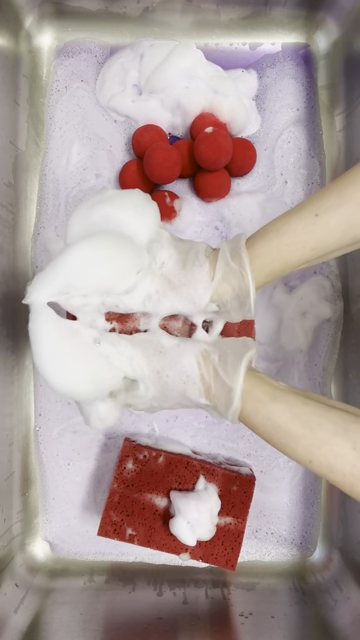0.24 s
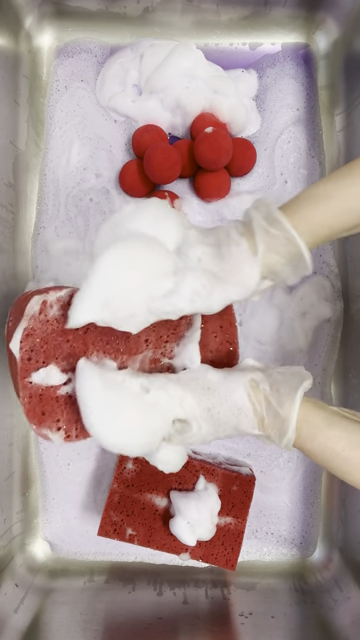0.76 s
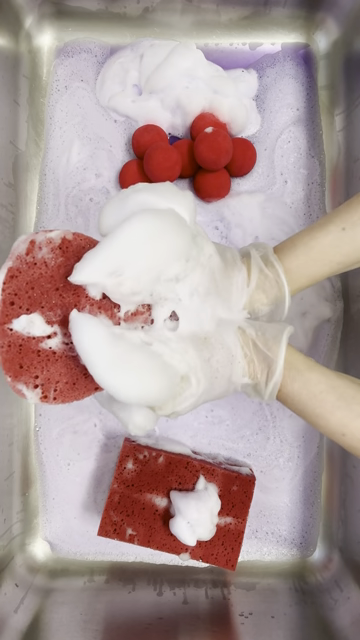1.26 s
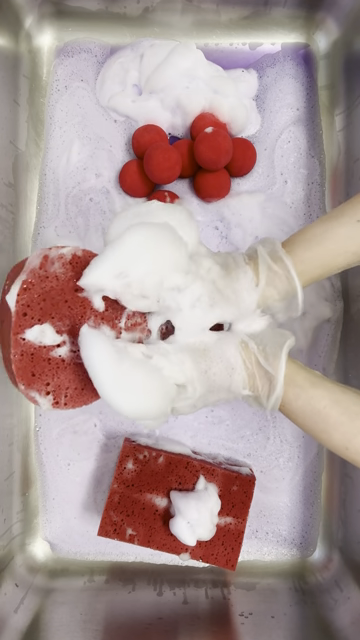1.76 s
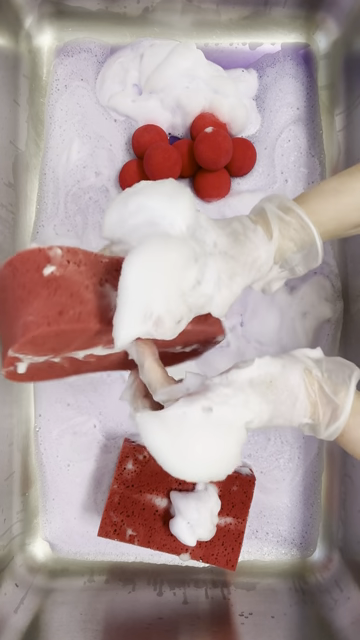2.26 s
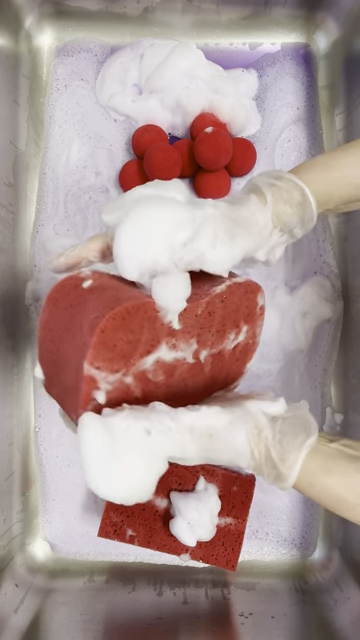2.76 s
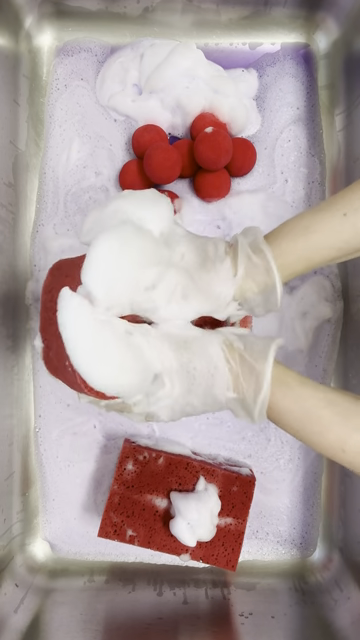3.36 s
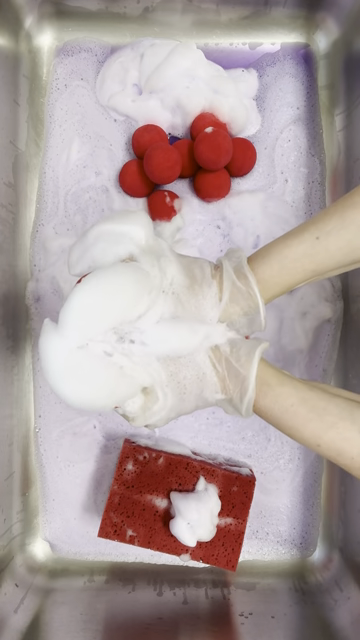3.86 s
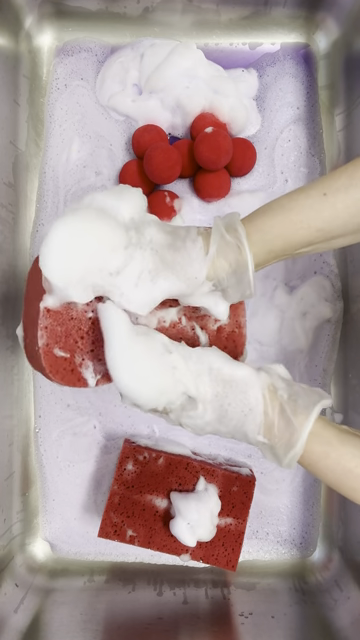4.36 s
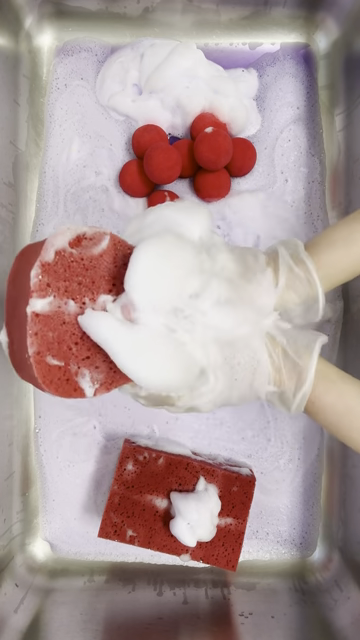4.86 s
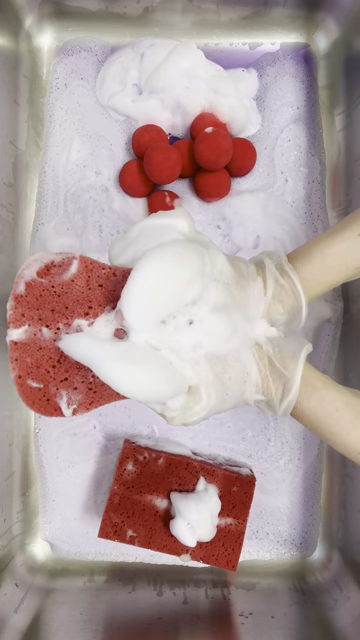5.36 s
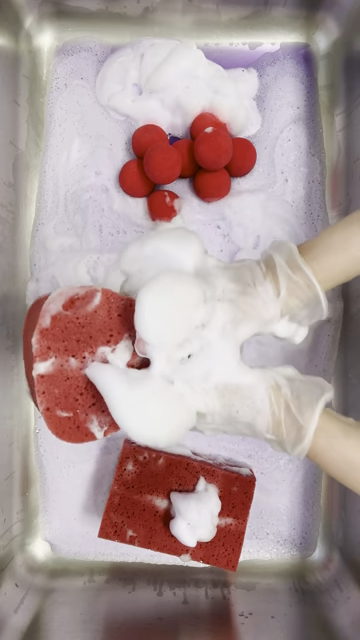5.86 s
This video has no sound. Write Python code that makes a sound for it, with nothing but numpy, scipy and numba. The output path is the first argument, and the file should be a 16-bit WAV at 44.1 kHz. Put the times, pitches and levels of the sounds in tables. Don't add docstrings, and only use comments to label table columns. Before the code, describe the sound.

Very close, intimate sound of a soapy sponge being pressed and released. It starts abruptly with a loud squelchy snap, then calms. Later squeezes gurgle with low air gulps, popping mid-pitched bubbles and fine crackling froth, separated by hushed pauses of light fizz and soft dull nudges of the metal tub. Quiet indoor room, faint hiss and hum, phone microphone.

```python
import sys
import numpy as np
from scipy import signal
from scipy.fft import rfft, irfft
from scipy.io import wavfile
from scipy.ndimage import uniform_filter1d
from numba import njit

SR = 44100
rng = np.random.default_rng(int(sys.argv[2]) if len(sys.argv) > 2 else 0)


def waveform_to_disk(signal):
    frames = np.transpose(np.atleast_2d(signal))
    scaled = np.clip(frames, -1, 1) * 32767
    samples = np.round(scaled).astype(np.int16)
    wavfile.write(sys.argv[1], SR, samples)


def voltage_ratio(level):
    return 10 ** (np.asarray(level, float) / 20)


N = 269447
HZ = np.arange(N // 2 + 1) * SR / N
MEDIUM_DB = -50

# lowest f/Hz, highest f/Hz, grains per s, length/cycles,
# glide per cycle, size scatter/dB, tilt/dB per octave
CROWDS = [
    (115.2, 485, 700, 4.2, 0.012, 0, -1),
    (459, 1406, 2500, 3.3, 0.0023, 0.5, 0.5),
    (1350, 2332, 2500, 5.9, 0.0038, -1.5, 2.5),
    (2250, 8500, 9000, 2.5, 0.0096, 0, -0.5),
]
FROTH_SKIN = (8000, 15800, 9806, 1, 0, 0, -26)
# level at a medium move/dB, force/dB per dB, share of the wetness
ANSWERS_TO_GRIP = [(-5.5, 1.05, -0.19), (-1.5, 1.08, -0.21), (-1.6, 0.95, 0.38), (-2.06, 0.9572, 0.78)]
# peak t/s, rise/s, fall/s, level/dB, wetness (fizz
# over pores)/dB
GRIP_MOVES = [(.012, 0.017, 0.039, -32.5, -7.5), (.04, 0.1, 0.1, -43.5, -0.5), (.095, .07, 0.038, -47, 0),
              (.15, 0.06, .06, -57, -7), (.205, 0.019, .04, -58, 7), (.25, 0.041, 0.05, -54.5, 9.5),
              (.3, 0.093, 0.17, -49, 0), (1.12, 0.25, 0.3, -51, -8.5), (1.19, 0.11, .1, -55.5, 5),
              (1.377, 0.39, 0.29, -40.5, -1), (1.5, 0.24, 0.14, -41.5, -3.5), (1.55, .08, 0.06, -47, -10),
              (1.72, 0.014, 0.11, -46.5, -3.5), (1.77, 0.055, 0.14, -49.5, -1.5),
              (3.455, 0.041, 0.17, -52.5, 4), (3.575, .05, 0.084, -57, -6), (3.71, 0.31, 0.18, -40.5, 0),
              (3.83, 0.62, 0.13, -42, -2.5), (3.9, 0.066, 0.042, -50.5, -2),
              (4.052, 0.03, 0.09, -51.5, 2.5), (4.116, 0.15, 0.23, -51, -1),
              (5.01, 0.15, 0.22, -47.5, -0.5), (5.11, .06, .08, -56, -4), (5.17, 0.17, 0.28, -44, 1.5),
              (5.33, 0.4, 0.32, -42, -1), (5.511, 0.55, 0.18, -44, -0.5),
              (5.77, 0.052, 0.068, -54.5, 1.5), (5.845, 0.12, 0.15, -45.5, -4),
              (.583, 0.32, 0.24, -54, -2.5), (.7, 0.11, 0.12, -55, 3), (.975, 0.077, 0.17, -53, 1),
               (1.925, 0.18, 0.18, -57.5, 3), (2.135, 0.11, 0.16, -56, 1), (2.3, 0.038, 0.13, -55.5, -4),
               (2.42, 0.12, 0.15, -59, 4), (2.52, 0.069, 0.07, -57, -15), (2.69, 0.12, 0.17, -62, 8.5),
               (2.985, 0.086, 0.078, -53.5, -5.5), (3.24, 0.14, 0.11, -63, 4.5),
               (3.36, 0.13, 0.076, -75, -14), (4.322, 0.26, 0.15, -58.5, 2), (4.501, 0.13, 0.2, -52.5, 0),
               (4.79, 0.083, 0.23, -54.5, 0.8), (6.022, 0.22, 0.23, -57, -1)]
# peak t/s, rise and fall/s, level/dB
SLIDING_SUDS = [(0.018, 0.13, -49), (0.291, 0.21, -56), (0.699, 0.72, -60.5), (1.1, 0.38, -62.5),
                (1.41, 0.26, -53.5), (1.536, 0.092, -57), (1.752, 0.094, -58.5), (1.961, 0.327, -61.5),
                (2.147, 0.092, -57), (2.381, 0.44, -64.5), (2.708, 0.058, -56), (3.026, 0.83, -63.5),
                (3.305, 0.417, -71), (3.515, 0.18, -58.5), (3.713, 0.21, -50.5), (3.847, 0.11, -49.5),
                (4.051, 0.13, -58), (4.254, 0.21, -60.5), (4.548, 0.16, -60), (4.937, 0.5, -62.5),
                (5.25, 0.35, -60.5), (5.436, 0.23, -55), (5.599, 0.054, -63), (5.9, 0.4, -64)]
# t/s, favoured pore f/Hz, trapped air level/dB
SPONGE_STATE = [(0, 760, 3.5), (.12, 750, 1), (.3, 810, -1), (.9, 794, 0), (1.33, 800, 0.5),
                (1.52, 930, -4), (1.75, 945, 0), (2.6, 720, -0.5), (3.35, 804, -5), (3.57, 1020, 2),
                (3.85, 1070, 0.5), (4.1, 910, -3), (4.7, 720, -1.5), (5.1, 840, 1), (5.35, 925, -6.5),
                (5.55, 1000, -6.5), (6.11, 800, -3)]
# t/s, peak level/dB, f/Hz, length/cycles
AIR_POCKETS = [(.0072, -13.5, 800, 4.9), (.0123, -13, 600, 3.6), (0.59, -34, 550, 5.6),
               (1.351, -27, 937, 4.5), (1.37, -24, 910, 5.2), (1.4, -25, 775, 8.2), (1.468, -41, 886, 5.5),
               (1.499, -25, 450, 2.6), (1.511, -23.5, 1150, 6.4), (1.519, -24, 890, 5.3),
               (1.563, -29, 939, 6), (1.614, -19, 740, 3.6), (1.715, -40, 800, 4.2), (1.797, -31, 650, 3.9),
               (2.29, -49, 900, 3.5), (2.972, -41, 750, 5.8), (3.706, -28, 980, 14),
               (3.719, -35, 1020, 5.5), (3.8365, -21, 1220, 3.9), (4.1134, -22.5, 1020, 4.3),
               (5.29, -30, 1270, 7), (5.344, -26.5, 790, 6.4), (5.841, -39, 730, 5.2),
               (5.858, -28.5, 1210, 7),
               (.008, -40, 1060, 2.9), (.1, -31, 1420, 7.2), (1.628, -28.5, 520, 3.8),
                 (1.641, -33, 470, 4.9), (3.73, -41, 105, 4.3), (3.79, -42, 110, 3.9),
                 (5.875, -46, 900, 3.7), (0.0134, -24, 397, 2.5), (.019, -38, 800, 3.5),
                 (.024, -26, 496, 5.6), (.031, -20, 800, 3.3), (.6, -46, 1040, 7.5),
                 (1.407, -28.5, 927, 21), (1.6124, -24, 1780, 5), (1.613, -26, 1220, 4),
                 (1.619, -27, 1740, 8.1), (1.6165, -26, 484, 5.4), (1.6185, -26, 243, 2.8),
                 (1.622, -32, 1100, 6.2), (3.845, -27, 760, 5.2), (4.1175, -26, 685, 3.4),
                 (4.124, -39, 850, 6.2), (4.128, -43, 1100, 4.1), (5.86, -35, 726, 8.6)]
# t/s, peak level/dB, f/Hz, length/cycles
AIR_GULPS = [(0.012, -26, 260, 4), (1.117, -39.5, 247, 15), (1.329, -31, 260, 5.7), (1.375, -43, 131, 5.5),
             (1.406, -25, 144, 2), (1.444, -30, 308, 7.9), (1.491, -48, 146, 5.4),
             (1.6155, -23.5, 292, 3.2), (1.627, -38, 300, 5), (1.6467, -37.5, 332, 16),
             (3.449, -34.5, 140, 2.8), (3.566, -30, 236, 8.8), (3.606, -32.5, 320, 4.6),
             (3.625, -27.5, 245, 7.3), (3.661, -29, 202, 5.7), (3.686, -27, 235, 4),
             (3.717, -26.5, 310, 6.4), (3.772, -25.5, 220, 4.6), (3.839, -33, 450, 6.3),
             (3.839, -23.5, 236, 6.9), (3.846, -28.5, 296, 3.8), (5.05, -40, 136, 16),
             (5.217, -27.5, 227, 4.3), (5.34, -23.5, 260, 4.2), (5.356, -26, 321, 4.5),
             (5.462, -38, 151, 3.4), (5.789, -38, 178, 3.6),
             (0.058, -42, 370.0, 4.5), (1.186, -36, 219, 4.2), (1.283, -33, 170.0, 4.5),
               (1.312, -44, 120.0, 4.5), (1.321, -34, 230.0, 5), (1.367, -25, 232, 5),
               (1.408, -22, 312, 5.6), (1.479, -26, 330.0, 4), (1.494, -36, 120.0, 4.5),
               (1.517, -48, 180.0, 4.5), (1.519, -36, 120.0, 4.5), (1.537, -42, 120.0, 4.5),
               (1.736, -38, 150.0, 5), (3.434, -37, 150.0, 3.9), (3.603, -45, 280.0, 4.5),
               (3.677, -37, 130.0, 4.5), (3.707, -34, 200.0, 4.5), (3.737, -40, 320.0, 4.5),
               (3.774, -31, 310.0, 4.5), (3.841, -37, 330.0, 5.9), (3.85, -37, 130.0, 4.2),
               (5.023, -40, 141, 4.9), (5.143, -34, 220.0, 4.5), (5.168, -40, 198, 4.9),
               (5.221, -38, 120.0, 4.5), (5.27, -35, 128, 4.5), (5.313, -48, 120.0, 4),
               (5.398, -31, 310.0, 5), (5.462, -41, 170.0, 4.5), (5.466, -33.5, 340, 4.5)]
# t/s, peak level/dB, f/Hz, length/cycles
SINGLE_PORES = [(1.23, -35, 814, 7.1), (1.316, -32, 610, 8), (1.326, -32, 685, 5.9),
                (1.327, -36, 1090.0, 7.1), (1.35, -37, 980, 6.5), (1.389, -30, 1000, 6.5),
                (1.393, -29, 840, 6.5), (1.44, -39, 1100.0, 6.5), (1.475, -38, 980, 6.5),
                (1.477, -29, 544, 5.6), (1.485, -38, 690.0, 7.1), (1.489, -37, 960, 7.1),
                (1.496, -40, 880, 6.5), (1.53, -36, 950.0, 8), (1.545, -39, 990.0, 6.5),
                (3.523, -38, 716, 6.5), (3.56, -42, 990.0, 3.7), (3.572, -33, 1170.0, 6.5),
                (3.584, -34, 1150.0, 6.5), (3.603, -36, 1160.0, 6.5), (3.609, -49, 720.0, 4.7),
                (3.653, -36, 1030.0, 6.5), (3.656, -38, 760.0, 6.5), (3.682, -39, 970, 6.5),
                (3.705, -38, 1180.0, 6.5), (3.72, -36, 1010.0, 6.5), (3.744, -32, 1180, 7.3),
                (3.759, -31, 990, 8), (3.77, -41, 930.0, 6), (3.77, -34, 710.0, 6.1),
                (3.77, -35, 1130, 6.5), (3.786, -36, 1040.0, 6.5), (3.805, -37, 1160.0, 6),
                (3.818, -41, 1290.0, 6.5), (3.846, -31, 1284, 6.5), (5.192, -30, 1320.0, 6.5),
                (5.265, -35, 830, 8.4), (5.289, -38, 1240.0, 6.5), (5.331, -34, 720, 8.1),
                (5.356, -34, 1040.0, 6.5), (5.363, -33, 815, 6.5), (5.376, -32, 1100, 6.5),
                (5.397, -37, 755, 6.5), (5.418, -40, 990.0, 6), (5.462, -34, 1180, 7.1)]
SMALL_PORES = [(1.272, -31, 1830, 8.5), (1.309, -33, 1870, 9.2), (1.337, -36, 1630.0, 8.5),
               (1.375, -41, 2020.0, 8.5), (1.397, -35, 1800.0, 8.5), (1.421, -30, 1640.0, 8.5),
               (1.429, -34, 1710.0, 8.5), (1.467, -39, 1730.0, 8.5), (3.571, -35, 1410.0, 8.5),
               (3.637, -41, 1670.0, 8.5), (3.646, -36, 1790.0, 8.5), (3.717, -43, 1750.0, 8.5),
               (3.726, -38, 1410.0, 8.5), (3.731, -35, 2210.0, 8.5), (3.738, -34, 1950.0, 8.5),
               (3.743, -39, 1630.0, 8.5), (3.755, -28, 1520.0, 8.5), (3.772, -38, 1630.0, 8.5),
               (3.796, -31, 2140, 10), (3.855, -34, 1830, 8.5), (5.112, -33, 1860, 8.5),
               (5.123, -31, 1870, 8.5), (5.15, -30, 1940, 8.5), (5.192, -37, 1410.0, 8.5),
               (5.194, -33, 1720, 8.5), (5.237, -38, 1710.0, 7.8), (5.243, -30, 1690.0, 10),
               (5.28, -37, 1860.0, 8.5), (5.288, -37, 1410.0, 8.5), (5.292, -35, 1990.0, 8.5),
               (5.296, -35, 1730.0, 8.5), (5.307, -31, 1800, 8.5), (5.365, -35, 1730.0, 8.5),
               (5.396, -36, 1880.0, 8.5), (5.407, -30, 1770.0, 9.2)]
FILM_CRACKS = [(.045, -31, 790, 5), (.088, -36, 740, 5), (.0075, -22, 1550, 4.3), (0.0101, -20, 1100, 3.8),
               (0.031, -19, 3400, 2.7), (0.038, -24, 3000, 2.5), (.0265, -20, 5300, 3.3),
               (0.021, -32, 1900, 6), (1.8, -35, 2750, 3.5), (.202, -51, 3780, 3.8), (.937, -42, 2880, 5.2),
               (1.109, -42, 2800, 4.5), (3.523, -28.5, 2500, 5.8), (3.778, -36, 2720, 4.5),
               (2.7, -40, 2760, 4.5), (5.842, -38, 2960, 4.5), (3.848, -28, 870, 3.1)]
# f/Hz, width/Hz, level/dB
TUB_PEAKS = [(143, 17, 5.5), (186, 15, 6.5), (244.4, 12.4, 6.5), (339, 13.1, 12.5), (397.7, 14.4, 7.5),
             (560, 7.6, 5.5), (630, 19, 0.5), (724, 63, 5.5), (800, 5.3, -1.5), (939, 13, 6),
             (1016, 13, 5.5), (1155, 113, 5.5), (1353, 30, 3.5), (1480, 40, 5), (1750, 28, 6),
             (1946, 70, 5.5), (2535, 55, 2.5), (3450, 28, -7), (3700, 800, 1.5)]
# f/Hz, width/Hz, level/dB
SUDS_DIPS = [(276, 41, -5.5), (376, 35.5, -12), (450, 115, -5), (1453, 78, -20), (2268, 85, -15)]
# t/s, peak level/dB
ARM_NUDGES = [(.01, -39), (0.522, -34), (1.03, -50), (1.22, -37), (1.35, -31), (1.489, -33.5), (2.3, -42),
              (2.609, -34), (2.972, -35.5), (3.562, -29.5), (3.8, -36), (4.361, -41.5), (4.718, -46),
              (5.201, -31), (5.56, -42.5), (5.809, -37.5)]
# f/Hz, level/dB per Hz
STILL_AIR = [(18, -39), (30, -9), (81, -1.5), (282, -13.5), (336, -9.5), (458, -6.5), (547, -5),
             (872, -21.5), (1890, -19), (2260, -22), (6000, -24.5), (7800, -29), (13200, -120)]
# f/Hz, level/dB per Hz
OPPOSED_AIR = [(80, -10), (200, -1.5), (400, -5), (900, -6.5), (1500, -13)]
# f/Hz, level/dB
SIDE_SHARE = [(60, -42), (170, -38), (345, -21), (405, -13.5), (620, -18), (720, -16), (1200, -10),
              (2200, -13.5), (2750, 0.5), (3300, -18), (3800, -10.5), (5500, -16), (9000, -37),
              (11700, -37), (14000, -11)]
# f/Hz, phase/half turns
PORT_LEAD = [(300, 0), (1200, .07), (1700, -.06), (3700, -.04), (4300, -.1), (4900, -.27), (6400, -.6),
             (7450, -.9), (8600, -1.11), (9900, -1.5), (11950, -2), (14000, -2.53), (15800, -3)]
# f/Hz, level/dB
LEFT_LOUDER = [(200, 0), (1000, .2), (2500, .9), (5000, .6), (7000, 0)]
# f/Hz, level/dB
CAPSULE_RESPONSE = [(2000, 0.5), (2800, 0.5), (4500, 1.5), (6000, 0), (8500, -2.5), (10000, -5),
                    (12000, -6), (15000, -2.5)]


def froth(walls):
    crowds = [swarm(walls, *row) for row in CROWDS + [FROTH_SKIN]]
    s, length, db = np.transpose(SLIDING_SUDS)
    crackle_db = 6.5 + swells(s, length, length, db)
    levels = [grip(*row) for row in ANSWERS_TO_GRIP] + [crackle_db]
    levels[0] = levels[0] + sponge(2)
    flutter_db = 0.8 * drift(700) + 0.56 * drift(3000)
    total = np.zeros((2, N))
    for crowd, db in zip(crowds, levels):
        total += np.array([crowd, np.roll(crowd, N // 2)]) * voltage_ratio(db + flutter_db)
    return total


def swarm(walls, lo_hz, hi_hz, rate, cycles, glide, scatter_db, tilt_db):
    count = min(int(rate * N / SR), 60000)
    when, pitch, long, a, b, slide = rng.random((count, 6)).T
    hz = lo_hz * (hi_hz / lo_hz) ** pitch
    size_db = tilt_db * np.log2(hz / lo_hz) + scatter_db * 2 * (a ** 2 + b ** 2)
    size = np.sqrt(hz) * voltage_ratio(size_db)
    favoured_hz = sponge(1)[(when * N).astype(int)]
    size = size * (1 + np.exp(-(np.log2(hz / favoured_hz) / 0.57) ** 2))
    grains = rings(when * N, hz, cycles * (0.5 + long), glide * (3 * slide - 1), size, 0.57, N)
    return unit(colour(grains, walls))


@njit
def rings(start, hz, cycles, glide, size, onset, n):
    y = np.zeros(n)
    for g in range(len(start)):
        f, turns, i = hz[g], 0., int(start[g])
        while turns < 2 * cycles[g] and i < n and f < .45 * SR:
            decay = np.exp(-2.5 * turns / cycles[g])
            rise = 1 - np.exp(-turns / onset)
            y[i] += size[g] * np.sin(2 * np.pi * turns) * decay * rise
            turns += f / SR
            f *= 1 + glide[g] * f / SR
            i += 1
    return y


def grip(gain_db=0, force=1, wet=0):
    s, rise, fall, db, wet_db = np.transpose(GRIP_MOVES)
    return gain_db + swells(s, rise, fall, db + wet * wet_db / force, force)


def swells(peak_s, rise_s, fall_s, peak_db, force=1):
    control = np.arange(0, N, 64)
    late = control / SR - peak_s[:, None]
    away = np.where(late < 0, -late / rise_s[:, None], late / fall_s[:, None])
    db = MEDIUM_DB + force * (peak_db[:, None] - MEDIUM_DB - 20 * away ** 1.72)
    total_db = 10 * np.log10(np.sum(voltage_ratio(db) ** 2, axis=0) + 1e-12)
    return np.interp(np.arange(N), control, total_db)


def sponge(column):
    return np.interp(np.arange(N) / SR, *np.transpose(SPONGE_STATE)[[0, column]])


def drift(size):
    once = uniform_filter1d(rng.standard_normal(N), size=size)
    return unit(uniform_filter1d(once, size=size))


def pockets():
    s, peak_db, hz, cycles = np.transpose(AIR_POCKETS)
    snap_hz = rng.uniform(1820, 2400, len(s))
    snap = rings(SR * (s - .001), snap_hz, 0.5 * cycles, 0 * s, voltage_ratio(peak_db - 15), 0.21, N)
    ring = rings(SR * s, hz, cycles, 0 * s - .012, voltage_ratio(peak_db - 2.5), 0.61, N)
    return snap + ring


def gulps():
    s, peak_db, hz, cycles = np.transpose(AIR_GULPS)
    return rings(SR * s, hz, cycles, 0 * s - .005, voltage_ratio(peak_db - 5), 0.34, N)


def pores_and_films():
    s, peak_db, hz, cycles = np.transpose(SINGLE_PORES + SMALL_PORES + FILM_CRACKS)
    return rings(SR * s, hz, cycles, 0 * s + 0.0015, voltage_ratio(peak_db + 2.5), 0.97, N)


def tub():
    gain = np.ones(len(HZ), complex)
    for hz, width, db in TUB_PEAKS + SUDS_DIPS:
        resonance = 1 + 1j * (HZ ** 2 - hz ** 2) / (np.maximum(HZ, 1) * width)
        gain *= 1 + (voltage_ratio(db) - 1) / resonance
    return gain


def nudges():
    s, peak_db = np.transpose(ARM_NUDGES)
    return rings(SR * s, 82.5 + 0 * s, 8.3 + 0 * s, 0 * s, voltage_ratio(peak_db + 2), 3.5, N)


def resting_suds():
    treble = 1 / (1 + (6500 / (HZ + 1)) ** 6)
    return np.array([noise(treble) for _ in range(2)]) * voltage_ratio(-57.5)


def still_air(walls):
    gain = voltage_ratio(over_hz(STILL_AIR)) * walls * (HZ > 95)
    return np.array([noise(gain) for _ in range(2)]) * voltage_ratio(-56)


def room_hum():
    mode = 1 / (1 + 1j * (HZ - 77) / 7.1) / (1 + (HZ / 100) ** 4)
    mode = mode + 0.12 / (1 + ((HZ - 62) / 20) ** 2)
    return noise(mode / (1 + 50 / (HZ + 1))) * voltage_ratio(-55 + 2 * drift(5000))


def draught():
    return noise(voltage_ratio(over_hz(OPPOSED_AIR)) * (HZ < 2000)) * voltage_ratio(-71.5)


def noise(gain):
    return unit(colour(rng.standard_normal(N), gain))


def over_hz(table):
    table = np.array(table)
    return np.interp(np.log(HZ + 1), np.log(table[:, 0] + 1), table[:, 1])


def unit(x):
    return x / np.sqrt(np.mean(x ** 2))


def colour(x, gain):
    return irfft(rfft(x) * gain, N)


def scene():
    walls = tub()
    knocks = colour(pockets() + gulps() + pores_and_films(), walls)
    side_knocks = np.roll(knocks, int(0.00282 * SR))
    background = resting_suds() + still_air(walls) + room_hum() + nudges()
    shared, sides = froth(walls) + background + np.array([knocks, side_knocks])
    apart = colour(sides, voltage_ratio(over_hz(SIDE_SHARE))) + draught()
    turn = np.exp(.5j * np.pi * over_hz(PORT_LEAD)) * voltage_ratio(over_hz(LEFT_LOUDER) / 2)
    return np.array([colour(shared, turn) + apart, colour(shared, 1 / turn) - apart])


def leveller(x):
    keep = np.exp(-1 / (0.062 * SR))
    power = signal.lfilter([1 - keep], [1, -keep], np.mean(x ** 2, axis=0))
    db = 10 * np.log10(power + 1e-12)
    return x * voltage_ratio(-0.099 * np.maximum(db + 50, 0))


def low_pass(x):
    return signal.sosfilt(signal.butter(12, 15810, fs=SR, output="sos"), x)


def record(dry):
    heard = leveller(colour(dry, voltage_ratio(over_hz(CAPSULE_RESPONSE))))
    low_cut = signal.butter(2, 60, "high", fs=SR, output="sos")
    return low_pass(signal.sosfilt(low_cut, heard))


dry = scene()
out = record(dry)
waveform_to_disk(out)
```